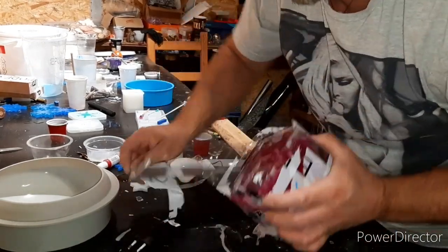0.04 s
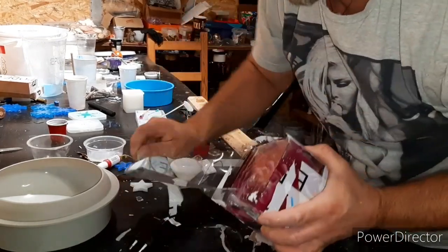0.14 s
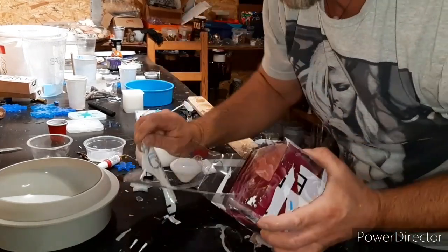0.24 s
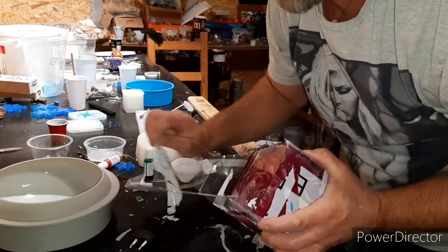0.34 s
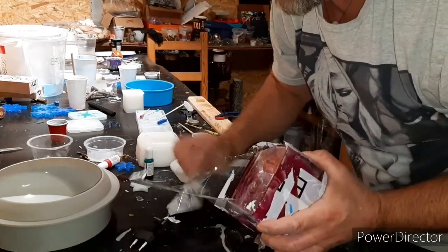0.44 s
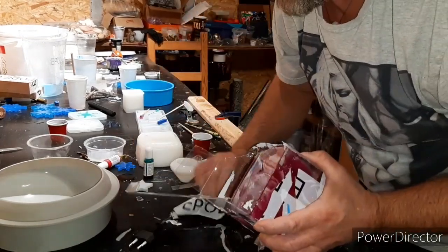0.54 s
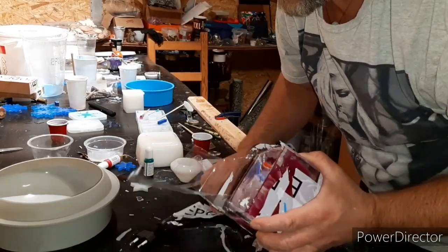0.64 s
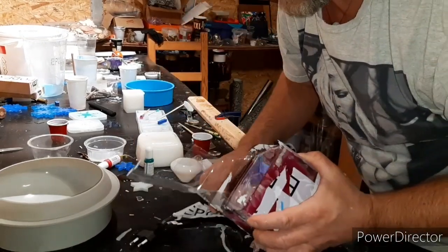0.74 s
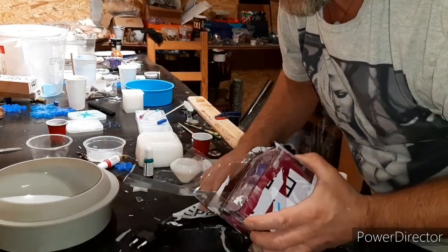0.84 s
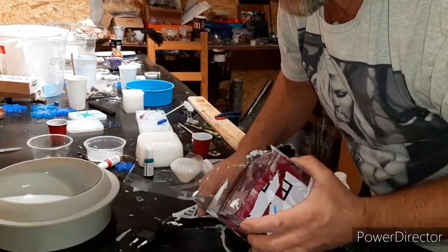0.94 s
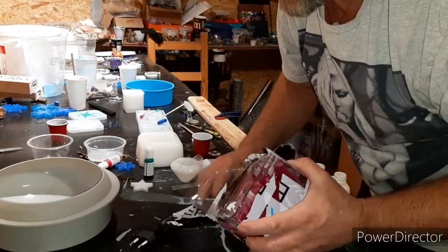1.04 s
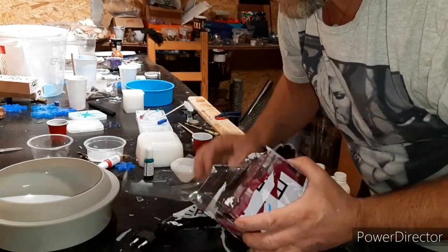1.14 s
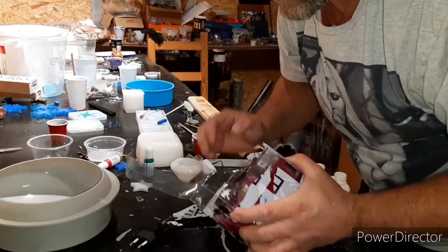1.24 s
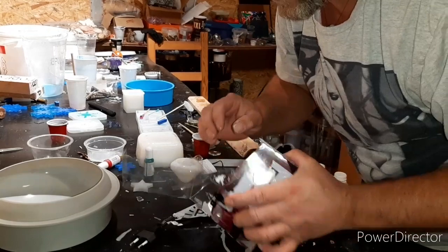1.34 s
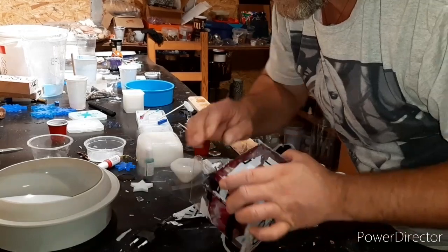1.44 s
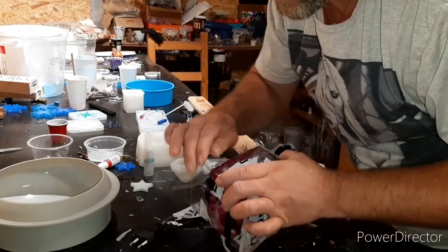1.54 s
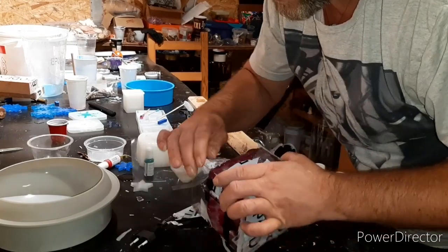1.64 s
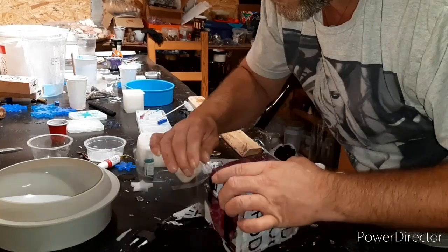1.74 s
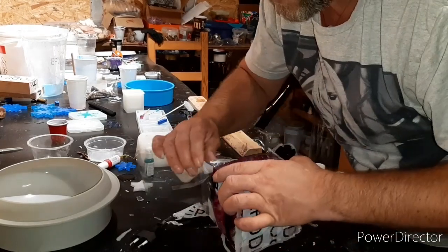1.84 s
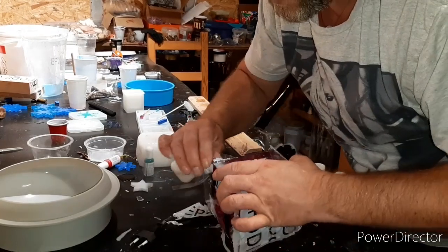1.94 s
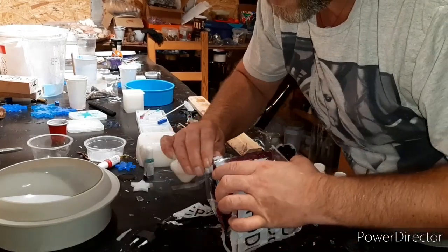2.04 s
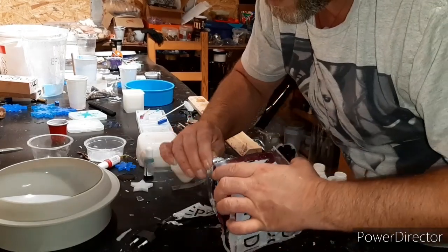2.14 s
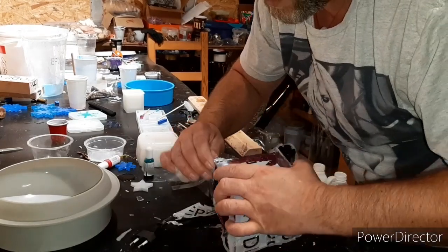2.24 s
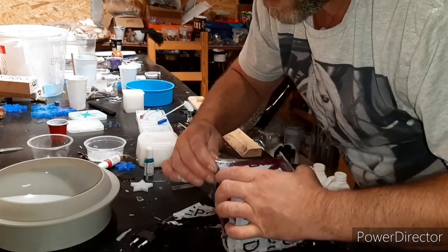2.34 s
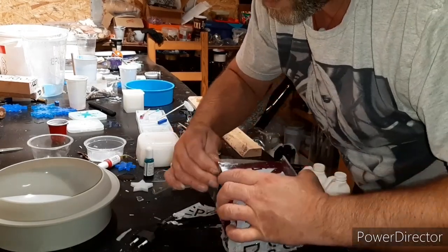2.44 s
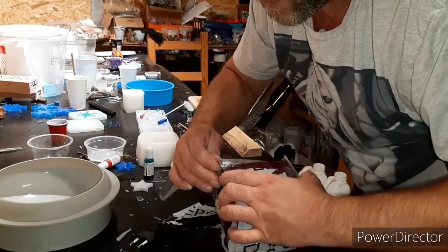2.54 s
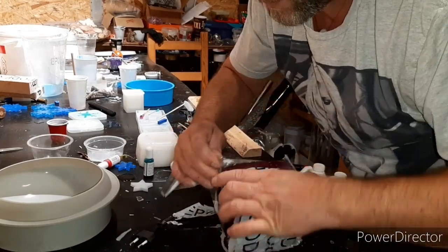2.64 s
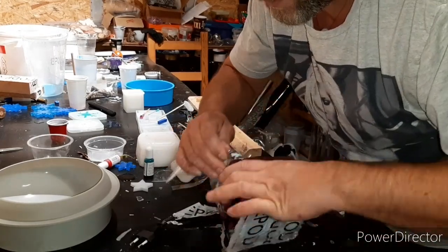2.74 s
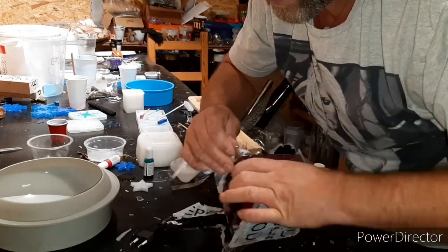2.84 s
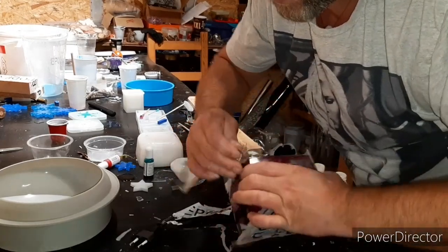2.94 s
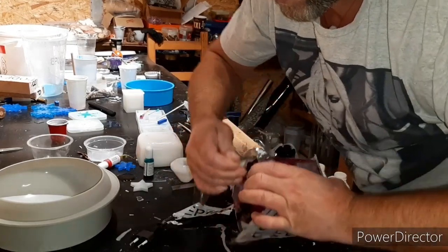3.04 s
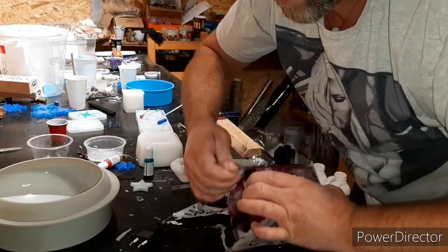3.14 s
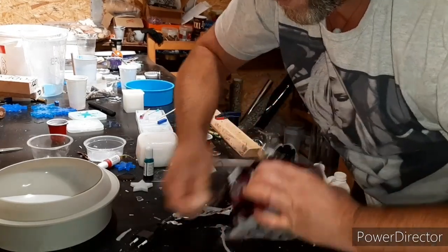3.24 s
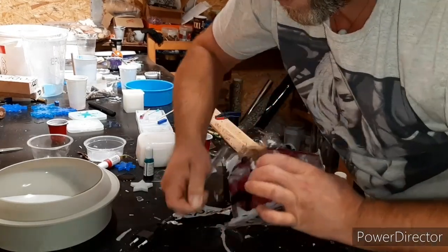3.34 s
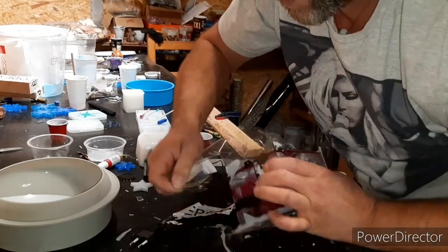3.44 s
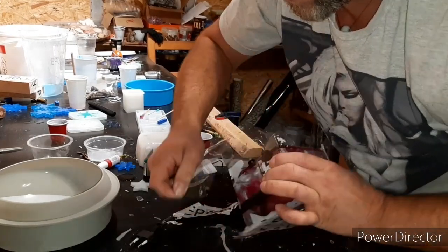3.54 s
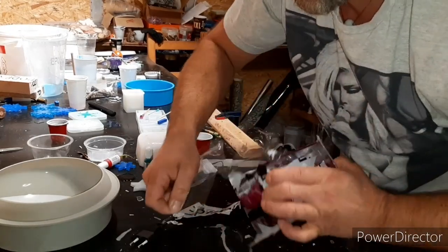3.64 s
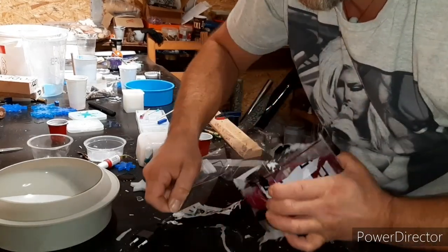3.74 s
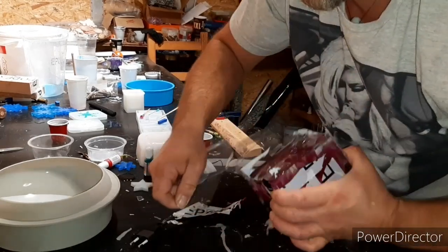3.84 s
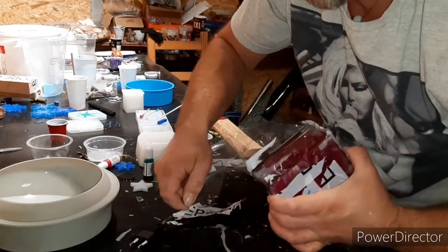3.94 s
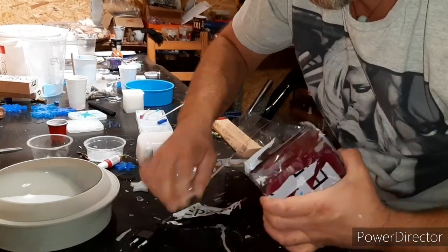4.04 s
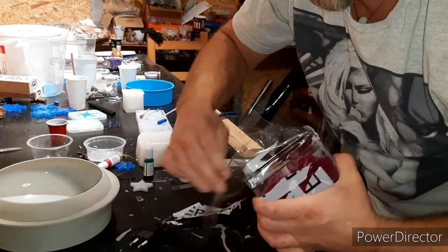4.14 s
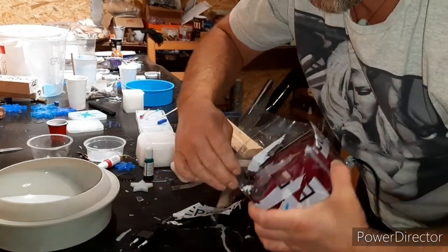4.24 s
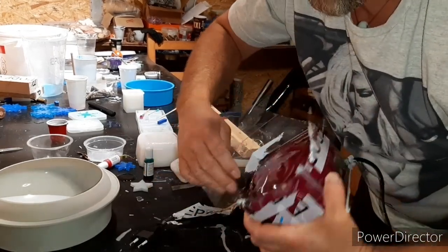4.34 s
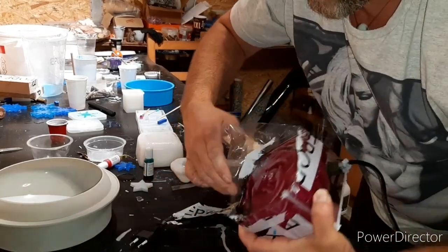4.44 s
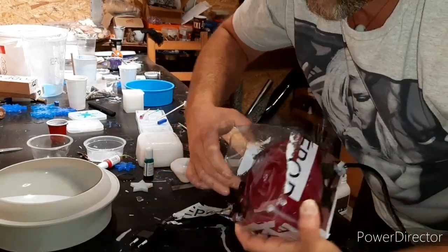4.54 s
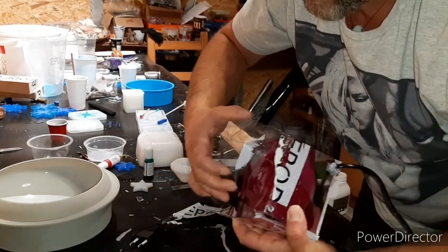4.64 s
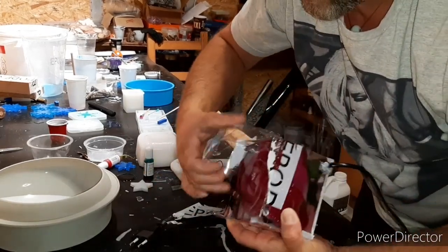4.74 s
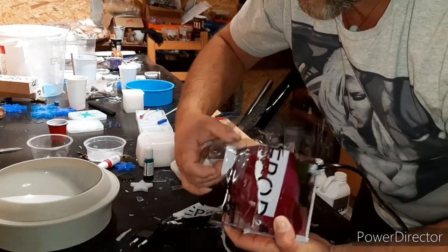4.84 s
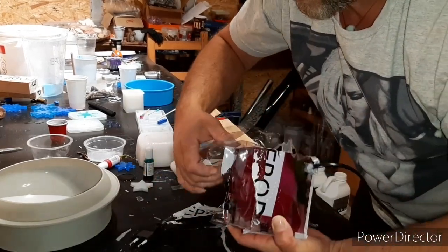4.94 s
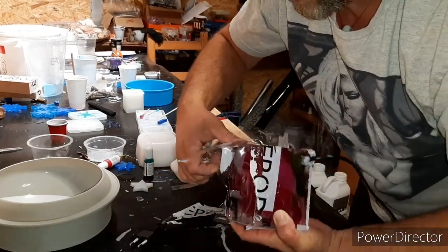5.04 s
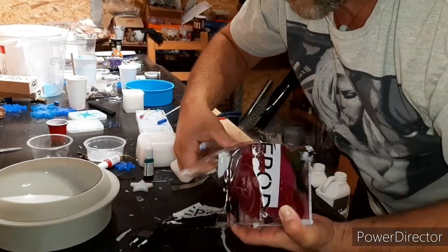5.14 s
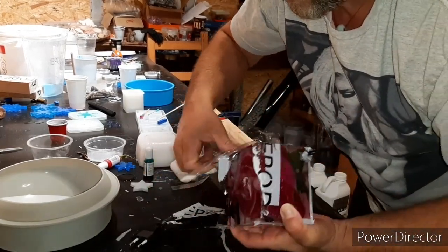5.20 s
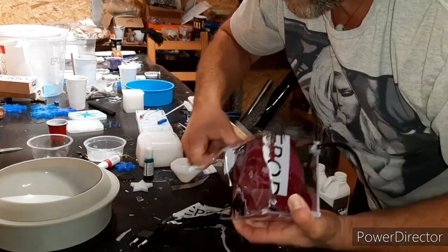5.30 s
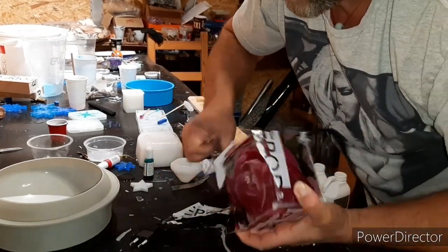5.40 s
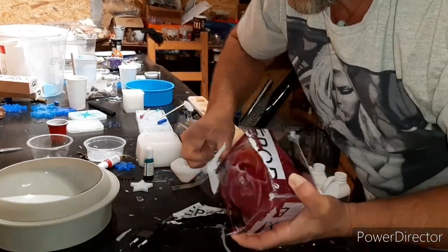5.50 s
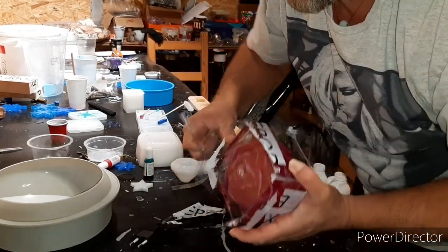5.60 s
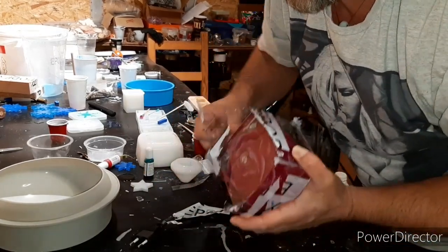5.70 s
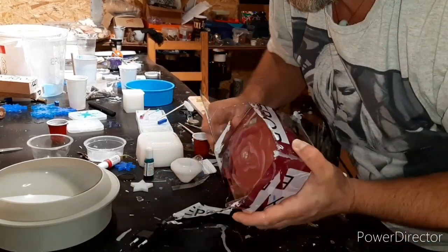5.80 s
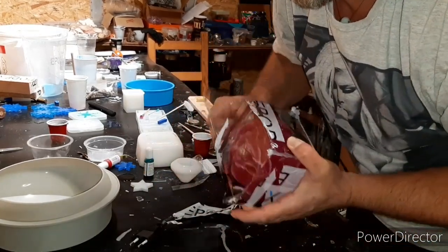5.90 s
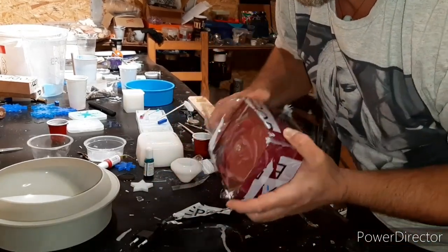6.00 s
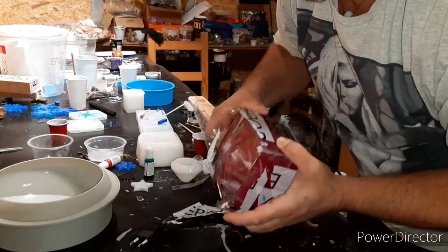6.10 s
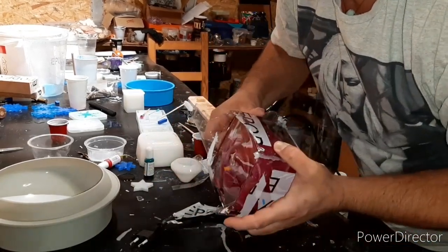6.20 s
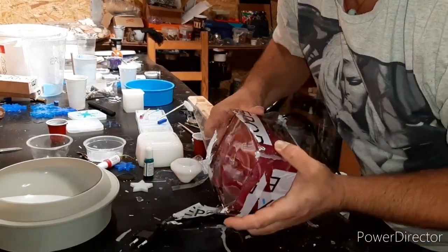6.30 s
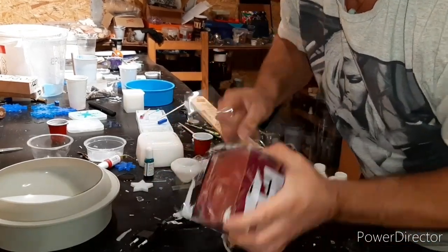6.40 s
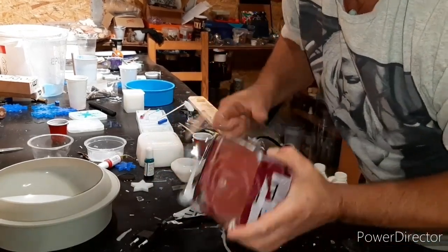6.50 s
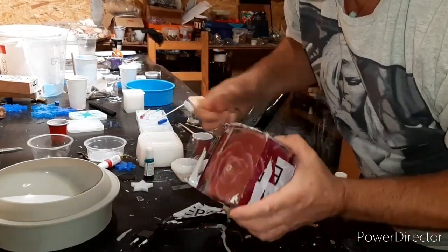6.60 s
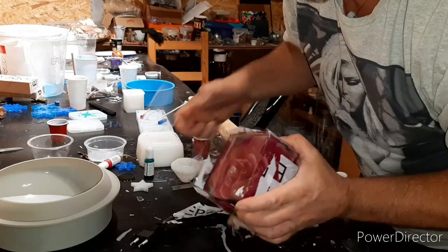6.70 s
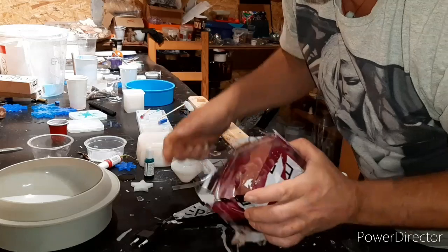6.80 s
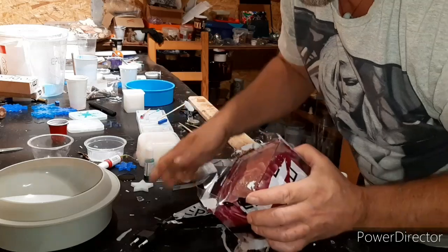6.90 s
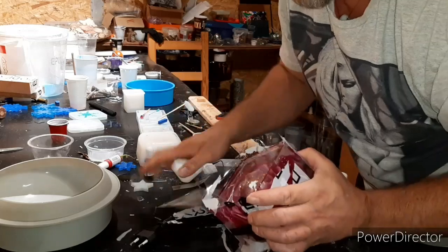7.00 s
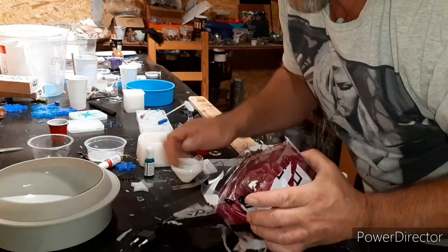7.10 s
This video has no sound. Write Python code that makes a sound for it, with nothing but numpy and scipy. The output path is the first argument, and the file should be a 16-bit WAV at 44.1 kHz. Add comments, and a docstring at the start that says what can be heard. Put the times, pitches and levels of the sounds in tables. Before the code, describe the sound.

Thin plastic crinkles, cracks and rips as hands peel it off a hard block, close up in a small workshop.

```python
"""A thin plastic cup is cracked and torn by hand off a cast resin block, on a bench in a small workshop.
First the fingers rub and crinkle the plastic, faint cracks tick and the block knocks dully.
At 1.7 s a flap springs free and rings; at 3.3 s a long rip runs through and jolts the microphone.
More cracks follow, each a burst of tiny fractures that rings the shell, with loud ones at 5.3-5.7 s.
A second rip comes at 6.4 s, then the grip relaxes and one last crack ticks."""
import sys
import numpy as np
from scipy import signal
from scipy.fft import rfft, irfft
from scipy.io import wavfile

SR = 44100
rng = np.random.default_rng(int(sys.argv[2]) if len(sys.argv) > 2 else 0)


def file_out(sig):
    """Save sig as 16-bit WAV at sys.argv[1]."""
    # one column per channel
    cols = np.atleast_2d(sig).T
    # limit, then scale
    lim = np.clip(cols, -1, 1)
    pcm = np.round(lim * 32767).astype(np.int16)
    wavfile.write(sys.argv[1], SR, pcm)


N = 315753
T = np.arange(N) / SR
HIT_SAMPLES = SR // 10
HIT_GAIN = np.sqrt(SR / 100)   # gives a hit of energy 1 an rms of 1 over 10 ms


def from_db(db):
    """Decibels to amplitude."""
    return 10 ** (np.asarray(db) / 20)


def unit(x):
    """Each row scaled to an energy of 1."""
    return x / np.sqrt(np.sum(x ** 2, axis=-1, keepdims=True) + 1e-20)


def at_hz(points, hz):
    """Reads a curve on a log-frequency axis."""
    known_hz, values = np.transpose(points)
    return np.interp(np.log(np.maximum(hz, 1)), np.log(known_hz), values)


def add(track, time, sound):
    """Mixes a sound in at a time in seconds."""
    start = round(time * SR)
    track[start:start + len(sound)] += sound[:N - start]


def band(x, low_hz, high_hz, order=2):
    """Causal band-pass."""
    edges = [low_hz, min(high_hz, SR / 2 - 1000)]
    return signal.sosfilt(signal.butter(order, edges, "band", fs=SR, output="sos"), x)


def ring(x, hz, t60):
    """One mode: a unit click sets a sine of height 1 ringing."""
    radius, angle = np.exp(-np.log(1000) / (t60 * SR)), 2 * np.pi * hz / SR
    return signal.lfilter([0, np.sin(angle)], [1, -2 * radius * np.cos(angle), radius ** 2], x + 1e-18)


def coloured(x, eq, size=4096):
    """Minimum-phase EQ, so that nothing sounds early; rms 1."""
    cepstrum = irfft(np.log(from_db(at_hz(eq, np.fft.rfftfreq(size, 1 / SR)))))
    cepstrum[1:size // 2] *= 2
    cepstrum[size // 2 + 1:] = 0
    impulse = irfft(np.exp(rfft(cepstrum)))
    return unit(signal.fftconvolve(x, impulse)[:N]) * np.sqrt(N)


def grains(per_s, spread_db):
    """Random slips: clicks of unequal size."""
    sizes = from_db(spread_db * np.minimum(rng.exponential(1, N), 4))
    return sizes * rng.choice([-1, 1], N) * (rng.random(N) < per_s / SR)


def strokes(cues, attack_s, t60):
    """Summed envelopes of (time, length, level) cues: a quick attack, a hold, an even fall in dB."""
    envelope = np.zeros(N)
    for time, length, level_db in cues:
        attack = np.clip((T - time) / attack_s, 0, 1)
        release = np.exp(-np.log(1000) * np.clip((T - time - length) / t60, 0, 2))
        envelope += from_db(level_db) * attack * release
    return envelope


# room tone EQ: (frequency [Hz], gain [dB])
AIR_EQ = [(30, -28), (100, 1), (240, -23), (800, -7.5), (2800, -17), (8000, -22), (16000, -26)]

def room_tone():
    """Still air: a soft, dark bed of noise, separate in each channel."""
    return np.array([coloured(rng.standard_normal(N), AIR_EQ) for _ in range(2)])


# decay of the workshop's reverb: (frequency [Hz], t60 [s])
REVERB_DECAY = [(120, 0.13), (400, 0.19), (1000, 0.16), (3500, 0.22), (7000, 0.27), (15000, 0.17)]
# how centred the reverb sits: (frequency [Hz], left-right likeness [0-1])
REVERB_LIKENESS = [(100, 0.46), (350, 0.32), (750, 0.45), (1500, 0.035), (16000, 0.018)]

def workshop_reverb(send, build_s):
    """Shelves and clutter scatter the sound into a dense tail that dies band by band."""
    t, impulse = T[:SR // 2], 0
    build = 1 - np.exp(-(t / build_s) ** 2)
    edges = np.geomspace(40, 18000, 19)
    for low, high in zip(edges, edges[1:]):
        hz = np.sqrt(low * high)
        alike = at_hz(REVERB_LIKENESS, hz)
        fade = build * from_db(-60 * t / at_hz(REVERB_DECAY, hz))
        mid, side = [unit(band(rng.standard_normal(len(t)) * fade, low, high, order=3)) for _ in range(2)]
        stereo = np.sqrt(1 + alike) * mid + np.sqrt(1 - alike) * side * [[1], [-1]]
        impulse += np.sqrt((high - low) / SR) * stereo
    return signal.fftconvolve(np.atleast_2d(send), impulse, axes=1)[:, :N]


def close_mics(x, scatter_db, pan_db):
    """Bench and recorder case scatter the treble differently into each mic; the right lags a sample."""
    t = T[:SR // 200]
    scatter = unit(band(rng.standard_normal(len(t)) * np.exp(-t / 0.0026), 2300, 18000))
    side = from_db(scatter_db) * signal.fftconvolve(x, scatter)[:N]
    return np.array([x + side, np.roll(x - side, 1)]) * from_db([[pan_db / 2], [-pan_db / 2]])


# firmness of the grip, which keeps the handling faintly going between moves: (time [s], level [dB])
GRIP_FADER = [(0, -84.5), (0.95, -89.5), (1.2, -69.5), (2.2, -79.5), (3.3, -70), (3.62, -73), (3.74, -96),
              (3.9, -80.5), (5.2, -71), (6.75, -77), (7.0, -103)]

def effort(moves, t60, grip_db):
    """Envelope of one handling layer: its moves ride on top of the grip."""
    held = from_db(np.interp(T, *np.transpose(GRIP_FADER)) + grip_db)
    return held + strokes(moves, attack_s=0.03, t60=t60)


# the block is handled: (time [s], length [s], level [dB])
RUMBLE_CUES = [(0.45, 0.015, -70), (0.715, 0.023, -64.5), (1.08, 0.03, -51.5), (1.38, 0.34, -81.5),
               (1.79, 0.055, -61), (2.02, 0.064, -58.5), (2.41, 0.076, -68), (2.82, 0.096, -67),
               (2.97, 0.062, -58), (4.52, 0.29, -75), (4.77, 0.033, -60), (5.33, 0.38, -74),
               (5.63, 0.095, -63), (6.54, 0.038, -60), (6.72, 0.054, -69)]
# its low tone: (frequency [Hz], gain [dB])
RUMBLE_EQ = [(30, -16), (70, -14.5), (120, -6), (220, -1.5), (400, -18.5), (1000, -64)]

def block_rumble():
    """Low grainy rumble of the block being handled."""
    rumble = coloured(grains(per_s=550, spread_db=2.0), RUMBLE_EQ)
    return effort(RUMBLE_CUES, t60=0.25, grip_db=-5.0) * rumble


# finger strokes along the shell: (time [s], length [s], level [dB])
RUB_CUES = [(0.72, 0.012, -50), (1.09, 0.08, -58.5), (1.94, 0.12, -61.5), (2.23, 0.057, -75),
            (2.36, .18, -59.5), (2.765, 0.027, -52.5), (2.86, 0.026, -53), (2.95, 0.16, -50),
            (3.12, 0.037, -40), (3.2, .12, -60.5), (3.655, 0.013, -67), (4.28, 0.042, -48.5),
            (4.41, 0.1, -65.5), (4.65, 0.21, -60.5), (4.77, .09, -56.5), (5.33, 0.53, -60),
            (5.67, 0.017, -36.5), (6.07, 0.025, -56), (6.18, 0.042, -61), (6.7, 0.022, -47)]
# their midrange tone: (frequency [Hz], gain [dB])
RUB_EQ = [(100, -37.5), (280, -15.5), (470, -3), (750, -2), (1050, -5.5), (1500, -7), (3000, -14),
          (8000, -49)]

def finger_rubs():
    """Fingers stick and slip on the shell, each slip a short ring."""
    slips = sum(ring(grains(per_s=110, spread_db=8.0), hz, t60=16 / hz) * np.sqrt(hz)
                for hz in np.geomspace(260, 3000, 18))
    return effort(RUB_CUES, t60=0.093, grip_db=-5.0) * coloured(slips, RUB_EQ)


# squeezes of loose film: (time [s], length [s], level [dB])
CRINKLE_CUES = [(0.3, 0.12, -79), (0.59, .09, -68), (0.69, 0.11, -52.5), (1.07, .1, -63),
                (1.685, 0.027, -61), (1.8, .3, -75.5), (2.45, .2, -74.5), (2.86, 0.26, -70.5),
                (3.1, .1, -71.5), (3.55, 0.061, -68), (3.83, 0.022, -80), (4.275, 0.028, -60),
                (4.41, 0.07, -69), (4.635, 0.088, -57.5), (4.78, .085, -55.5), (5.58, .13, -56),
                (6.06, .05, -50.5), (6.17, 0.077, -50.5), (6.62, .12, -68), (7.11, 0.017, -68)]
# their crisp top: (frequency [Hz], gain [dB])
CRINKLE_EQ = [(400, -30), (1000, -10.5), (1700, -7), (2600, -2.5), (4000, 1.5), (7000, -5), (8800, -10.5),
              (14500, -13.5), (16000, -26.5)]

def film_crinkles():
    """The harder the loose film is crushed, the more folds flip."""
    crush = effort(CRINKLE_CUES, t60=0.23, grip_db=-1.5)
    folds_per_s = 1500 * np.sqrt(crush / from_db(-61))
    folds = grains(folds_per_s, spread_db=3.5) / np.sqrt(folds_per_s)
    return crush * coloured(folds, CRINKLE_EQ)


def hit_push(length, ragged_db):
    """What drives a hit, in two rows: ragged jerks towards the mics, a clean click to all sides."""
    jerks = rng.standard_normal(HIT_SAMPLES) * from_db(ragged_db * rng.standard_normal(HIT_SAMPLES))
    click = np.arange(HIT_SAMPLES) == round(length * SR / 4)
    progress = T[:HIT_SAMPLES] / length
    attack = 1 - np.exp(-progress / 0.073)
    return np.array([jerks * attack * np.exp(-2 * progress ** 2), click])


def shell(push, hz, t60, others_db):
    """The bent shell has one main mode, and weaker ones that shift with every grip; lows are cut."""
    main = unit(ring(push, hz, t60))
    others = sum(unit(ring(push, hz * 2 ** octaves, t60)) * rng.choice([-1, 1])
                 for octaves in rng.uniform(-0.879, 0.854, 10))
    return unit(band(main + from_db(others_db) * unit(others), hz / 2, hz * 2))


# dull knocks of block and fingers:
# (time [s], length [s], level [dB], ring pitch [Hz], clack against the level [dB])
KNOCK_CUES = [(0.727, 0.0044, -51, 802, 0), (1.087, 0.0065, -52, 834, 0.5), (1.096, 0.0051, -59, 880, 5.5),
              (1.151, 0.0047, -50, 275, 1), (1.864, 0.0018, -60.5, 314, -1),
              (2.06, 0.0099, -45.5, 307, -9.5), (2.071, .019, -49.5, 305, -12),
              (2.354, 0.0018, -58.5, 290, -34), (2.484, 0.0059, -55, 320, -0.5),
              (2.766, 0.0071, -48.5, 598, -10), (3.041, .006, -37.5, 876, -8.5),
              (3.164, 0.0089, -42.5, 506, -28), (3.895, 0.0063, -41.5, 825, 1.5),
              (4.071, 0.0048, -48.5, 690, -1.5), (4.19, .004, -43, 434, -8.5),
              (4.386, 0.0067, -45.5, 303, 2), (4.786, 0.02, -51.5, 665, 8), (6.549, 0.003, -37, 526, -5.5),
              (6.74, 0.012, -49, 300, 2.5), (6.855, 0.0062, -63.5, 506, 1)]
WEIGHT_OFF_S, THUD_LEANING_DB, THUD_LIFTED_DB = 2.6, -1.5, -23.5

def knocks():
    """Soft contacts ring the plastic; the bench thuds while the block is leaned on. Direct and send."""
    direct, send = np.zeros(N), np.zeros(N)
    for time, length, level_db, hz, clack_db in KNOCK_CUES:
        thud_db = THUD_LEANING_DB if time < WEIGHT_OFF_S else THUD_LIFTED_DB
        push = hit_push(length, ragged_db=5.5)
        rings = shell(push, hz, t60=0.045, others_db=0.0)
        thud = unit(band(ring(push, hz=130, t60=0.16), 110, 180))
        tick = unit(band(push, 2100, 5200))
        clack = unit(shell(push, hz=1384, t60=0.0069, others_db=2.5) + from_db(-12.0) * tick)
        knock = rings + from_db(thud_db) * thud + from_db(clack_db) * clack
        ahead, around = from_db(level_db) * HIT_GAIN * knock
        add(direct, time, ahead)
        add(send, time, around)
    return direct, send


# fizzy lead-ins to cracks: (end time [s], rise [s], level [dB])
SWELL_CUES = [(1.724, 0.0093, -34.5), (3.129, 0.004, -43.5), (4.648, 0.0024, -42), (5.262, 0.0062, -32.5),
              (6.168, 0.0096, -39)]

def fizzy_swells():
    """A brief fizzy swell just before five of the cracks."""
    swell = sum(from_db(level_db) * np.exp(-((T - time) / rise) ** 2) * (T < time)
                for time, rise, level_db in SWELL_CUES)
    fizz = unit(band(grains(per_s=6900, spread_db=-1.5), 1800, 4400)) * np.sqrt(N)
    return swell * fizz


# modes of flaps that spring free: (time [s], pitch [Hz], level [dB], t60 [s])
FLAP_CUES = [(1.722, 417, -33.5, .22), (1.722, 1202, -25, 0.092), (1.726, 2085, -21.5, 0.05),
             (4.652, 1674, -35.5, .16), (5.263, 411, -27.5, 0.12), (5.265, 4370, -31.5, .14),
             (5.265, 1815, -27, .12), (5.722, 198, -44.5, .5)]

def flaps():
    """A freed flap swings up within a few cycles and rings out."""
    out, t = np.zeros(N), T[:SR]
    for time, hz, level_db, t60 in FLAP_CUES:
        envelope = (1 - np.exp(-t * hz / 2)) * from_db(level_db - 60 * t / t60)
        add(out, time, envelope * np.sin(2 * np.pi * hz * t))
    return out


# low bumps as each rip starts: (time [s], pitch [Hz], level [dB])
JOLT_CUES = [(3.351, 125.5, -14), (6.447, 100, -13)]

def mic_jolts():
    """A rip jolts the left mic: one low swing and its rebound, faint on the right."""
    out = np.zeros(N)
    for time, hz, level_db in JOLT_CUES:
        cycles = T[:HIT_SAMPLES] * hz
        swell = cycles ** 2 * np.exp(-cycles / 0.13)
        add(out, time, -from_db(level_db) * swell / swell.max() * np.sin(2 * np.pi * cycles))
    return band(out, 42, 3000) * from_db([[0], [-26]])


# two long rips at full force, then petering out: (time [s], length [s], level [dB], t60 [s])
RIP_CUES = [(3.348, 0.028, -20, 0.2), (6.445, 0.037, -19, 0.24)]
# their broad rasp: (frequency [Hz], gain [dB])
RIP_EQ = [(60, -21.5), (300, -13.5), (570, -0.5), (1070, -5), (1800, -1), (2300, -0.5), (3900, 1.5),
          (7000, -5), (8800, -8), (14800, -9.5), (16000, -23)]

def rips(stutter_db=10.5, stutters_per_s=160):
    """Thousands of fractures a second, in fits and starts; the flapping sheet spreads them wide."""
    stutter = np.interp(T * stutters_per_s, np.arange(N), rng.uniform(-1, 1, N))
    envelope = sum(strokes([cue], attack_s=0.0034, t60=t60) for *cue, t60 in RIP_CUES)
    centre, left, right = [coloured(grains(per_s=7000, spread_db=4.0), RIP_EQ) for _ in range(3)]
    return from_db(stutter_db * stutter) * envelope * (0.5 * centre + 0.92 * np.array([left, right]))


# cracks in the shell, with body and brightness set against the level:
# (time [s], length [s], level [dB], ring pitch [Hz], body [dB], brightness [dB])
CRACK_CUES = [(0.157, 0.00087, -73.5, 3300, -21, -2), (0.301, 0.0018, -72, 3600, -10, 3.5),
              (0.366, 0.0036, -73, 2420, 1.5, 6.5), (0.59, 0.0024, -67, 1480, 0, -10),
              (0.635, 0.0023, -71.5, 1310, -18, 9), (0.689, 0.0012, -59.5, 2950, -12, 9.5),
              (0.757, 0.0055, -58.5, 2340, 1, 5.5), (0.808, 0.0012, -58.5, 1680, -5, 10),
              (0.92, 0.00087, -81.5, 3100, -8, 16.5), (1.076, 0.0032, -60, 2000, -4, -1.5),
              (1.631, 0.0058, -57.5, 2280, -11, -10), (1.725, 0.0071, -33, 1290, -7.5, -9.5),
              (2.647, 0.0053, -64, 1370, -2.5, -12), (2.865, 0.0058, -54.5, 1450, 4.5, -8),
              (2.913, 0.0023, -48.5, 1310, 1, -15.5), (3.093, 0.0085, -40, 1320, -2.5, -29),
              (3.127, 0.0082, -38, 1630, -5, -11.5), (3.317, 0.0026, -27.5, 1300, -16, -18.5),
              (3.3515, .002, -17.5, 1670, -16.5, -15.5), (3.365, 0.0053, -21, 1140, -17, -10),
              (3.39, 0.0086, -19.5, 1826, -22.5, -10), (3.551, 0.0023, -43, 1960, -8.5, -1.5),
              (3.573, 0.0022, -50.5, 1620, -20.5, 1.5), (3.774, 0.0021, -49.5, 2850, -6, -20),
              (3.836, 0.0039, -60.5, 1700, -29, 6), (3.9948, 0.0025, -25.5, 1690, -20.5, -30),
              (4.079, 0.0019, -46.5, 2020, -9, -12), (4.113, 0.0035, -52, 1960, -7, -6),
              (4.253, 0.0048, -54, 1940, -1, -9), (4.278, 0.0096, -44, 2520, -6, -7),
              (4.421, 0.0019, -53, 1390, -6.5, -14.5), (4.451, 0.0023, -62.5, 1410, -14, -18),
              (4.495, .002, -60.5, 1370, -4, -7.5), (4.612, 0.0013, -57, 1520, -15, -2.5),
              (4.648, 0.007, -35, 1740, -16.5, -15), (4.836, 0.0024, -39, 1680, -5, -11),
              (4.95, .009, -39.5, 1820, -13, -10), (5.262, 0.003, -20, 1810, -8.5, -16),
              (5.41, .006, -41, 1500, -2, -14.5), (5.453, .003, -38.5, 2160, -14.5, -15),
              (5.489, 0.0027, -17, 2170, -8, -13.5), (5.4945, 0.0028, -16, 1580, -5.5, -25),
              (5.598, 0.0028, -43, 2330, -27, -7.5), (5.646, .009, -27.5, 2156, -9.5, -14),
              (5.721, .011, -14, 2460, -13.5, -24.5), (5.887, 0.0021, -40.5, 2260, -16.5, -6),
              (6.061, 0.0018, -47, 2000, -18, -9), (6.166, 0.0096, -33, 1830, -13, -14.5),
              (6.219, 0.0053, -39.5, 1580, -31, -7), (6.242, 0.0037, -35.5, 1980, -1.5, -28.5),
              (6.401, 0.0018, -57.5, 1630, -11.5, 2), (6.449, 0.0029, -24, 1790, -18, -1.5),
              (6.486, .008, -19, 2360, -35, -7.5), (6.665, 0.0013, -49.5, 2430, -11, -9),
              (6.686, .001, -58.5, 2840, -4, 5), (6.698, 0.0029, -41, 2330, -13, -33),
              (7.115, 0.011, -61.5, 1425, -3, -5)]

def cracks():
    """Tiny fractures ring the shell, shake its body and spit treble. Direct sound and reverb send."""
    direct, send = np.zeros(N), np.zeros(N)
    for time, length, level_db, hz, body_db, bright_db in CRACK_CUES:
        # the brighter a crack, the more it cuts and the more it fills the room
        bite_db, send_db = 1.5 + 0.38 * bright_db, 2.5 + 0.2 * bright_db
        push = hit_push(length, ragged_db=3.5)
        modes = shell(push, hz, t60=0.011, others_db=-2.0)
        rings = unit(modes + from_db(-9.0) * unit(band(push, 1400, 2700)))
        body = unit(band(push, 320, 850))
        bite = unit(band(band(push, 2700, 7700, order=6), 2600, 6000, order=1))
        fizz = unit(band(push, 6730, 14000, order=3))
        crack = rings + from_db(body_db) * body + from_db(bite_db) * bite + from_db(bright_db) * fizz
        ahead, around = from_db(level_db) * HIT_GAIN * crack
        add(direct, time, ahead)
        add(send, time, from_db(send_db) * around)
    return direct, send


def scene():
    """The mix: hands and plastic up close, over the workshop's reverb and room tone."""
    cracking, crack_send = cracks()
    knocking, knock_send = knocks()
    textures = block_rumble() + finger_rubs() + film_crinkles() + fizzy_swells()
    tearing = rips()
    close = close_mics(cracking + knocking + flaps() + textures, scatter_db=-8.5, pan_db=4.5)
    send = crack_send + from_db(-1.5) * knock_send + from_db(0.5) * textures + from_db(-3.0) * tearing
    reverb = workshop_reverb(send, build_s=0.00088)
    return from_db(-80.5) * room_tone() + reverb + mic_jolts() + tearing + close


def record(dry):
    """A soft clip rounds the tallest peaks; a steep low-pass cuts the top."""
    ceiling, cutoff_hz = 0.9, 15650
    rounded = dry / (1 + (dry / ceiling) ** 4) ** (1 / 4)
    return signal.sosfilt(signal.ellip(10, 0.3, 80, cutoff_hz, fs=SR, output="sos"), rounded)


dry = scene()
out = record(dry)
file_out(out)
```